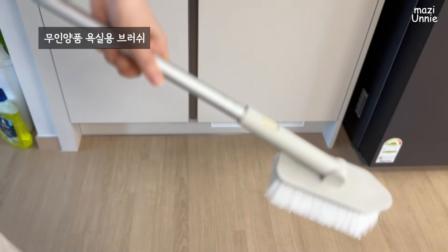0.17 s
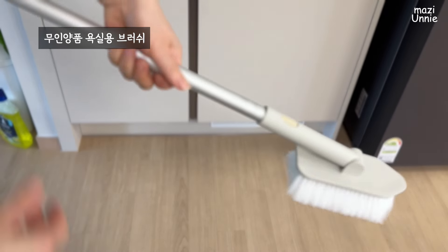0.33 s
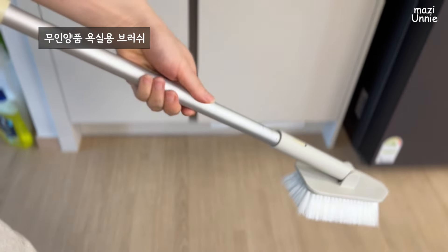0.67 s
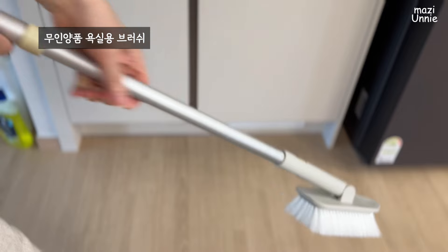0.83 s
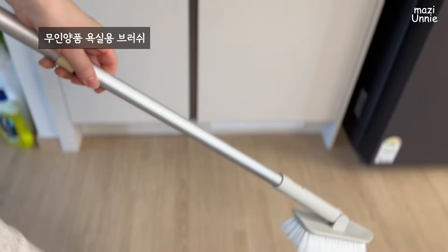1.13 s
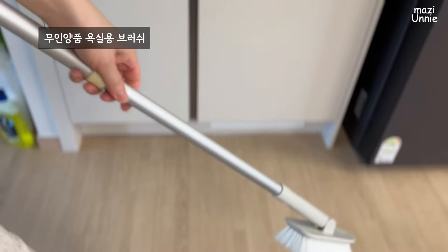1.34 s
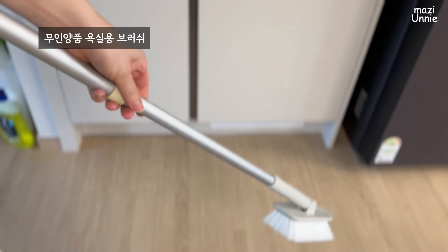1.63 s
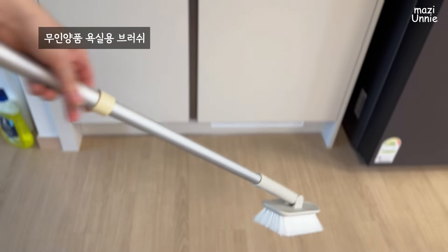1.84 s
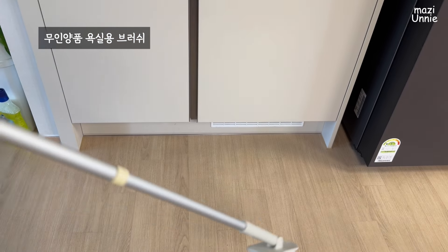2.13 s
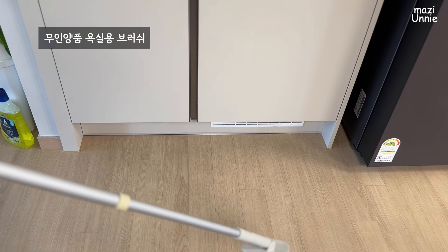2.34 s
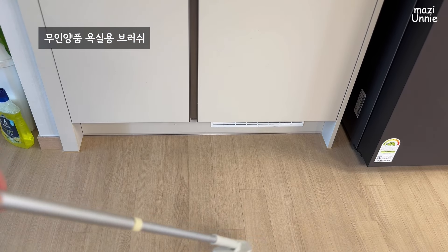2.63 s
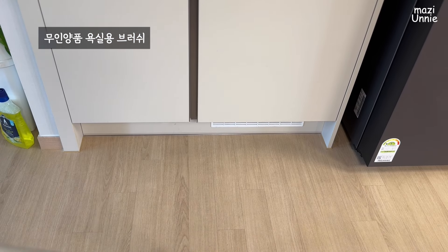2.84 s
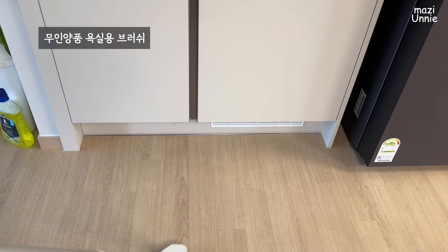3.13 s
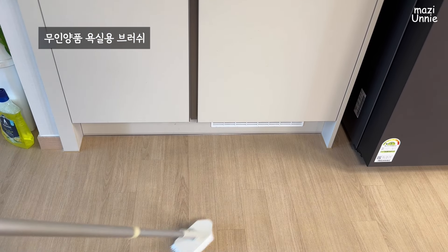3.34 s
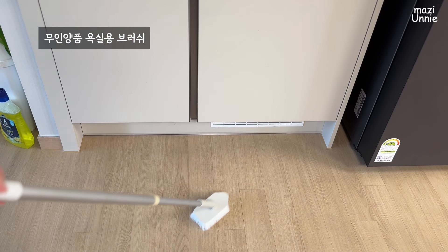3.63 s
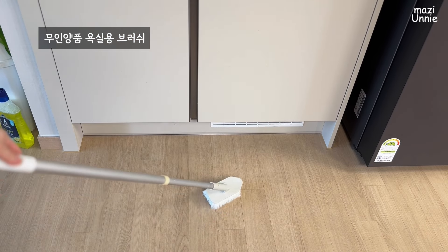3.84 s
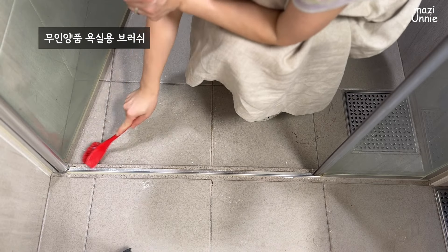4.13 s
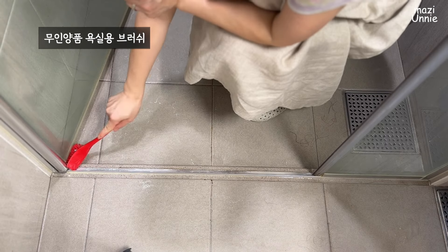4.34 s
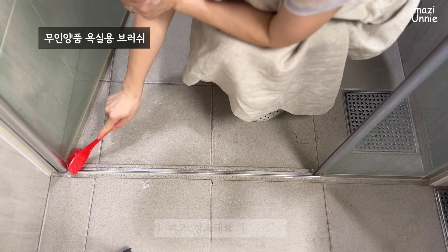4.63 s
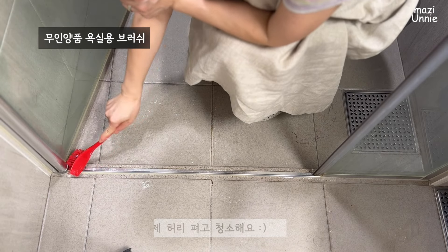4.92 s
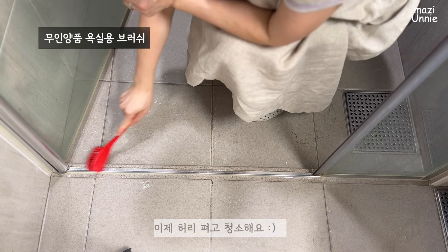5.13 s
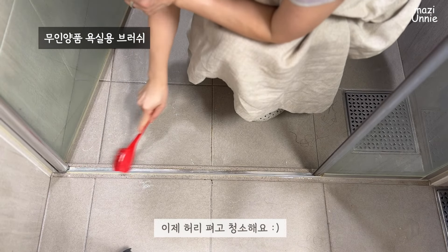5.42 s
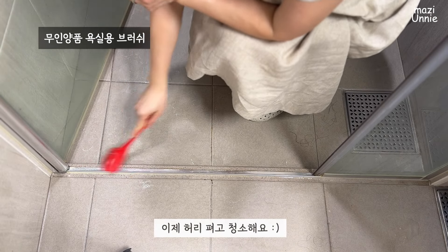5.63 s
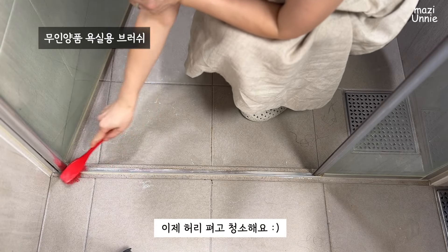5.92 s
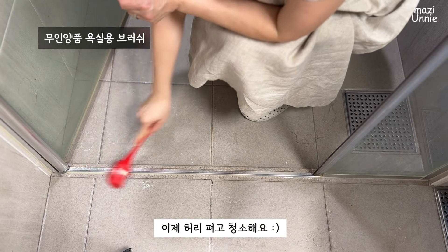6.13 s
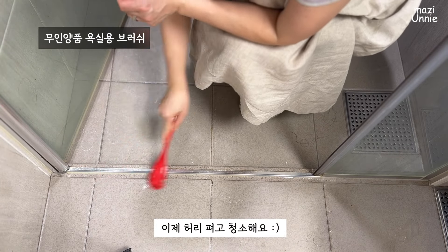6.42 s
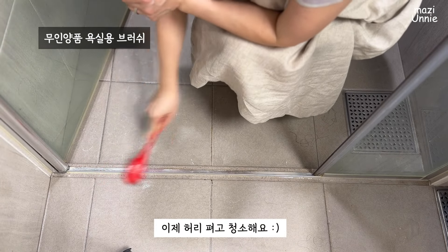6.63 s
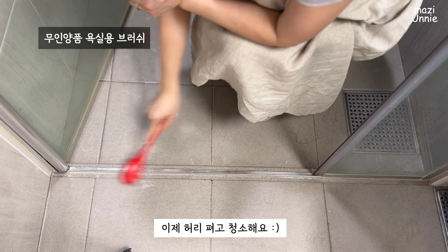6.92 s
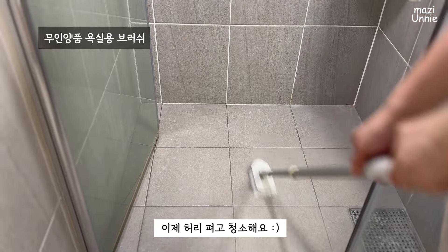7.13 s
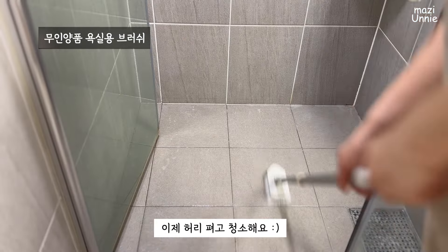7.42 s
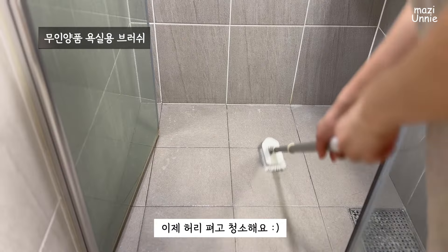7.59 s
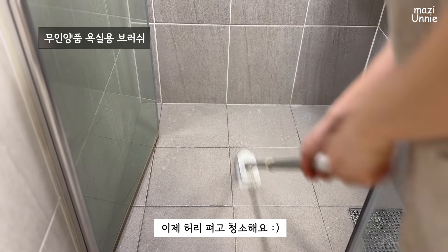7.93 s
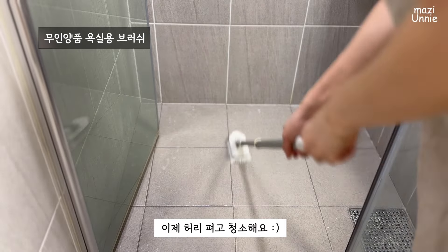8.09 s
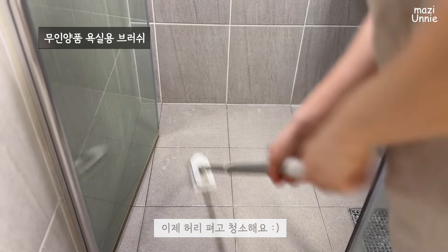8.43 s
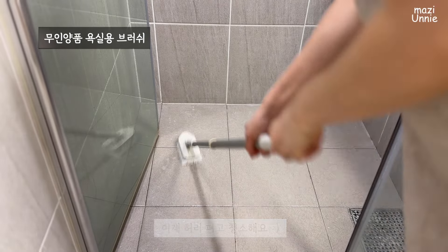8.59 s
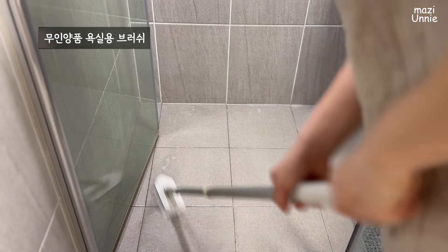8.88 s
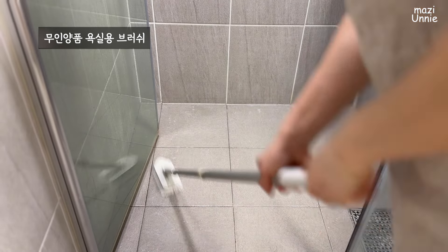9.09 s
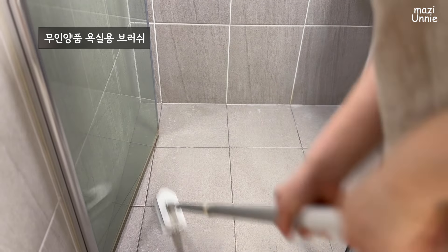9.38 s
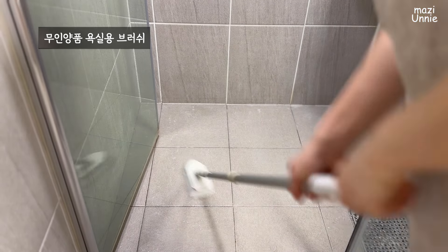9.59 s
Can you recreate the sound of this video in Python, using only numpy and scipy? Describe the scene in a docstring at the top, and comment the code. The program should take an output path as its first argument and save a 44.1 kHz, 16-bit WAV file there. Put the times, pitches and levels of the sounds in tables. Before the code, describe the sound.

A wavering low appliance hum and soft rumble fill a lively kitchen from 0 to 4.2 s. A metal pole slides through a hand with a thin bright hiss, swelling around 0.8 s; a small clack comes at 0.65 s and clicks at 1.4-1.5 s as its lock snaps. Dry bristle sweeps on wood follow from 1.6 s, with light plastic clacks, then a loud, hard clack with rapid rebounds and metallic ring at 2.85 s. Softer clacks come near 3.3 s, and sweeping continues. At 4.2 s the hum cuts to a quiet, small tiled shower. Faint scuffs, scrapes and knocks accompany short hand-brush strokes, about six per second, pausing briefly at 5.75 s and then louder and brighter. From 7.1 s a pole brush makes longer, fuller hissing strokes, about four per second, with soft low floor thuds. At 9.0 s it bumps the glass dully; scrubbing continues until about 9.8 s.

```python
"""In a kitchen, over a low appliance hum, a long-handled brush slides through the hand and sweeps a wooden
floor; its hinged plastic head clacks. Then, in a quiet tiled shower, a hand brush scrubs in quick short
strokes and a pole brush in longer ones, once bumping the glass screen.
Friction is shaped random bristle flicks, raised by stroke speed; impacts are damped modes and noise bursts;
the hum is a wavering sine; decaying noise gives the reflections of each room."""
import sys
import numpy as np
from scipy import signal
from scipy.fft import rfft, irfft, next_fast_len
from scipy.io import wavfile

SR = 44100
rng = np.random.default_rng(int(sys.argv[2]) if len(sys.argv) > 2 else 0)


def inscribe(sig):
    """Save sig as 16-bit PCM at rate SR to the path in sys.argv[1].

    A 1-D sig is mono; a 2-D sig holds one channel per row.
    Samples are clipped to [-1, 1] before scaling.
    """
    pcm = np.round(np.clip(np.atleast_2d(sig).T, -1, 1) * 32767)
    wavfile.write(sys.argv[1], SR, pcm.astype(np.int16))


N = 429975
TIME = np.arange(N) / SR
SHOWER_FROM_S, POLE_BRUSH_FROM_S = 4.163, 7.09
PORT_LAG_S = .000263
CLACK_LAG_S = .00011   # the head clacks more nearly straight ahead


def from_db(db):
    """Logarithmic level: decibels to amplitude gain."""
    return 10 ** (np.asarray(db) / 20)


def rms_one(x):
    """Normalization: scale to unit root-mean-square amplitude."""
    return x / np.sqrt(np.mean(x ** 2) + 1e-20)


def low_passed(x, order, cutoff_hz):
    """Low-pass filtering: keep what lies below the cutoff."""
    return signal.sosfilt(signal.butter(order, cutoff_hz, fs=SR, output="sos"), x)


def coloured(x, spectrum):
    """Spectral shaping: weight a steady signal by a spectrum that falls away beyond its ends; rms 1."""
    hz, db = np.transpose(spectrum)
    size = next_fast_len(N)
    f = np.maximum(np.arange(size // 2 + 1) * SR / size, 1)
    slopes = np.minimum(1, np.minimum(f / hz[0], hz[-1] / f)) ** 2
    gain = from_db(np.interp(np.log(f), np.log(hz), db)) * slopes
    return rms_one(irfft(rfft(x, size) * gain, size)[..., :N])


def drift(rate_hz):
    """Slow random modulation: a smooth wander of rms 1 through random knots."""
    knots = rng.standard_normal(int(N / SR * rate_hz * 2) + 2)
    return rms_one(np.interp(TIME * rate_hz * 2, np.arange(len(knots)), knots))


def near(x, lag_s=PORT_LAG_S):
    """Path difference: direct sound reaches the left microphone port a little before the right."""
    taps = np.arange(24)
    fractional_delay = np.sinc(taps - lag_s * SR) * np.hanning(len(taps))
    return np.array([x, signal.lfilter(fractional_delay, 1, x)])


def room(x, t60, treble_t60, alike_below_hz):
    """Reverberation: a diffuse tail of unit power with separate bass and treble decays, its bass alike at both ports."""
    t = TIME[:SR]
    noise = rng.standard_normal((2, SR))
    bass = signal.sosfiltfilt(signal.butter(2, alike_below_hz, fs=SR, output="sos"), noise)
    noise = noise - bass + bass[0]
    dull = signal.sosfiltfilt(signal.butter(1, 3500, fs=SR, output="sos"), noise)
    tail = dull * from_db(-60 * t / t60) + (noise - dull) * from_db(-60 * t / treble_t60)
    tail *= np.minimum(t / 0.0048, 1)   # reflections build up first
    tail /= np.sqrt(np.sum(tail ** 2, axis=1, keepdims=True))
    return signal.oaconvolve(x[None], tail, axes=1)[:, :N]


def lingering(gain, wet, t60):
    """Energy storage: reflections of a moving source hold its level up for a moment."""
    r = from_db(-120 / (t60 * SR))   # decay of power per sample
    held_power = signal.lfilter([1 - r], [1, -r], gain ** 2 + 1e-18)
    return np.sqrt((1 - wet) * gain ** 2 + wet * held_power)


def bristles(spectrum, flicks_per_s, spread_db, clump_db, channels=1):
    """Stick-slip: single bristles catch and flick free at random; whole tufts letting go bunch the flicks."""
    shape = (channels, N)
    released = rng.random(shape) < flicks_per_s / SR
    flicks = released * rng.standard_normal(shape) * from_db(spread_db * rng.standard_normal(N))
    bunching_db = clump_db * drift(220) + 2.0 * clump_db * drift(35)
    return coloured(flicks * from_db(bunching_db), spectrum)


def stroke_levels(starts, levels_db, end_s, tops, overlap_s):
    """Kinematics: the brush speeds up and slows to the turn; each noise (a row of levels) follows the speed.

    tops: place of top speed within a stroke, 0-1; overlap_s: bristles still flexing at the turn."""
    power, speed = np.zeros((len(levels_db), N)), np.zeros(N)
    ends = np.append(starts[1:], end_s)
    for k, (start, end) in enumerate(zip(starts - overlap_s, ends + overlap_s)):
        span = slice(int(start * SR), int(end * SR))
        fastest = start + tops[k % len(tops)] * (end - start)
        swing = np.sin(np.pi * np.interp(TIME[span], [start, fastest, end], [0, .5, 1]))
        speed[span] += swing
        power[:, span] += (from_db(levels_db)[:, k, None] * swing) ** 2
    return speed, np.sqrt(power)


def strike(times, levels_db, modes, vary_db):
    """Modal superposition: each contact rings every damped mode with a strength of its own."""
    at, out = np.round(np.asarray(times) * SR).astype(int), np.zeros(N)
    chance = rng.standard_normal((len(at), len(modes)))
    for k, (hz, db, t60) in enumerate(modes):
        blows = np.full(N, 1e-18)
        blows[at] = from_db(levels_db + db + vary_db * chance[:, k]) * (-1) ** k
        r, w = from_db(-60 / (t60 * SR)), 2 * np.pi * hz / SR
        out += signal.lfilter([0, np.sin(w)], [1, -2 * r * np.cos(w), r * r], blows)
    return out


def rattle(times, levels_db, pitches_hz, t60, width):
    """High modal density: crowded, quickly damped modes as a noise burst around each contact's pitch."""
    out, t = np.zeros((2, N + SR)), TIME[:SR // 4]
    for s, db, hz in zip(times, levels_db, pitches_hz):
        edges = np.clip([hz / (1 + width), hz * (1 + width)], 20, .45 * SR)
        band = signal.butter(2, edges, "band", fs=SR, output="sos")
        alike = 1 / (1 + (hz / 600) ** 2)   # long waves reach both ports alike
        shared = np.sqrt(alike) * rng.standard_normal(len(t))
        separate = np.sqrt(1 - alike) * rng.standard_normal((2, len(t)))
        burst = rms_one(signal.sosfilt(band, shared + separate))
        out[:, round(s * SR):][:, :len(t)] += burst * from_db(db - 60 * t / t60)
    return out[:, :N]


# resonances of the plastic head: (frequency [Hz], relative level [dB], t60 [s])
HEAD_MODES = [(172.7, -12.5, 0.19), (484, -7, 0.023), (984, -6, 0.027), (1727, -3.5, 0.029),
              (2130, -3.5, 0.03), (4260, -10.5, 0.03)]


def plastic(contacts, ring_db, rattle_db, rattle_t60, tick_t60):
    """Impact excitation: the hard head rings and rattles, and a brief bright tick comes with each contact."""
    times, levels_db, pitches_hz, tick_db = np.transpose(contacts)
    ring = near(strike(times, levels_db + ring_db, HEAD_MODES, vary_db=3.5), CLACK_LAG_S)
    body = ring + rattle(times, levels_db + rattle_db, pitches_hz, rattle_t60, width=0.36)
    tick = rattle(times, tick_db - 12.0, np.full(len(times), 11000), tick_t60, width=0.9)[0]
    return body, tick


# spectra of the kitchen's rumble and air noise: (frequency [Hz], relative density [dB per Hz])
RUMBLE_SPECTRUM = [(35, -15.5), (55, 3.5), (90, -8.5), (170, -5.5), (300, -12), (500, -19.5), (900, -50)]
KITCHEN_AIR_SPECTRUM = [(60, -1.5), (200, 4), (650, 4), (1500, -5.5), (3000, -16), (4400, -11), (5900, -4),
                        (7700, -17), (11000, -36.5)]
HUM_HZ, HUM_DB = 59.5, -53.5


def kitchen_background():
    """Tonal and broadband radiation: a wavering hum over low rumble and air noise."""
    waver = from_db(1.4 * drift(5))
    hum = from_db(HUM_DB) * waver * np.sqrt(2) * np.sin(2 * np.pi * HUM_HZ * TIME + .15 * drift(6.7))
    rumble = from_db(-56.5) * coloured(rng.standard_normal(N), RUMBLE_SPECTRUM)
    air = from_db(-59.5) * coloured(rng.standard_normal((2, N)), KITCHEN_AIR_SPECTRUM)
    return (hum + rumble) * from_db([[-.4], [.4]]) + air


# spectrum of the bathroom's air noise: (frequency [Hz], relative density [dB per Hz])
BATHROOM_AIR_SPECTRUM = [(25, 5), (45, 7), (66, 17), (95, 6), (200, -14), (1500, -5)]


def bathroom_air():
    """Broadband background: faint noise dominated by the bass."""
    return from_db(-81.5) * coloured(rng.standard_normal(N), BATHROOM_AIR_SPECTRUM)


# weight shifting on the floor: (time [s], relative level [dB])
THUDS = [(4.908, -63.5), (5.2, -70), (7.17, -63), (7.218, -57.5), (7.71, -56), (8.179, -62), (9.66, -60),
         (9.711, -62)]
# resonances of the floor: (frequency [Hz], relative level [dB], t60 [s])
FLOOR_MODES = [(66.5, -7, 0.14), (128, -4, 0.072), (175, -9, 0.097), (243, -10, 0.078)]


def floor_thuds():
    """Structural resonance: shifting weight sets the floor's low modes ringing softly."""
    return from_db(2.5) * strike(*np.transpose(THUDS), FLOOR_MODES, vary_db=1.0)


# brush on the sill and tile joints:
# (time [s], relative body level [dB], pitch [Hz], relative tick level [dB])
KNOCKS = [(4.595, -63, 2700, -58), (4.964, -63.5, 1400, -85), (5.036, -61, 1260, -72),
          (6.742, -65, 1900, -56), (7.035, -64.5, 1250, -74), (8.345, -63.5, 740, -62)]


def tile_knocks():
    """Impact excitation: the brush knocks on the shower's sill and tile joints."""
    return plastic(KNOCKS, ring_db=-30, rattle_db=2.5, rattle_t60=0.11, tick_t60=0.023)


# bristles along the sill: (start [s], end [s], relative level [dB])
SILL_SCRAPES = [(4.365, 4.4, -70), (4.405, 4.46, -62.5), (4.96, 5.25, -73), (5.025, 5.075, -66)]
# resonances of the sill: (frequency [Hz], relative level [dB], t60 [s])
SILL_MODES = [(1040, 3, 0.04), (1285, 3.5, 0.12), (1460, -3, 0.061)]
SILL_SLIPS_PER_S, SILL_SPREAD_DB, SILL_GRIT_HZ = 600, 2.5, 1530


def sill_scrapes():
    """Stick-slip: bristles slip in quick uneven jerks along the sill, gritty and a little hollow."""
    times, levels_db = [], []
    for start, end, db in SILL_SCRAPES:
        slips = int(SILL_SLIPS_PER_S * (end - start))
        places = rng.random(slips)
        swell_db = 10 * np.log10(np.sin(np.pi * places))
        times.extend(start + places * (end - start))
        levels_db.extend(db + swell_db + SILL_SPREAD_DB * rng.standard_normal(slips))
    levels_db = np.array(levels_db)
    pitches_hz = SILL_GRIT_HZ * 2 ** (0.48 * rng.standard_normal(len(times)))
    hollow = near(strike(times, levels_db - 14.5, SILL_MODES, vary_db=3.0))
    return hollow + rattle(times, levels_db - 4, pitches_hz, t60=0.033, width=0.61)


# contacts of brush and glass screen: (time [s], relative level [dB], pitch [Hz])
BUMPS = [(8.9982, -35.5, 900), (9.005, -34.5, 310), (9.009, -35.5, 480), (9.023, -38, 704),
         (9.047, -40, 400)]
# resonances of the screen: (frequency [Hz], relative level [dB], t60 [s])
SCREEN_MODES = [(270, -7, 0.03), (370, -3, 0.03), (490, -7, 0.073), (795, -14, 0.03), (1170, -17, 0.027)]
BUMP_SOFT_HZ = 1160   # the cushioned contact excites little above this
BEND_DB, BEND_FROM_HZ, BEND_TO_HZ = -36, 1644, 320
BEND_DROP_S, BEND_SWELL_S = 0.0018, 0.0054   # time constant of the pitch drop; time to the peak


def glass_bump():
    """Dispersion: treble runs ahead in the glass, so the first wave falls in pitch; modes and chatter follow."""
    times, levels_db, pitches_hz = np.transpose(BUMPS)
    t = np.maximum(TIME - times[0], 0)
    hz = BEND_TO_HZ + (BEND_FROM_HZ - BEND_TO_HZ) * np.exp(-t / BEND_DROP_S)
    fade = np.exp(np.maximum(.5 - .5 * (t / BEND_SWELL_S) ** 2 / 2, -60))
    swell = np.sqrt(t / BEND_SWELL_S) * fade
    bend = from_db(BEND_DB) * swell * np.sin(2 * np.pi * np.cumsum(hz * (t > 0)) / SR)
    pane = strike(times, levels_db - 5, SCREEN_MODES, vary_db=0.5)
    chatter = rattle(times, levels_db - 6, pitches_hz, t60=0.1, width=1.0)
    return bend + low_passed(pane + chatter, 2, BUMP_SOFT_HZ)


# onset of the pane's sway just after the bump: (time [s], relative level [dB])
SWAY = [(9.036, -54)]
# slow modes of the whole pane: (frequency [Hz], relative level [dB], t60 [s])
SWAY_MODES = [(64.6, 2.2, 0.56)]


def glass_sway():
    """Fundamental resonance: just after the bump the whole pane sways."""
    return strike(*np.transpose(SWAY), SWAY_MODES, vary_db=0)


# the telescopic pole's lock snapping home: (time [s], relative level [dB])
LOCK = [(1.5052, -45)]
# modes of the lock: (frequency [Hz], relative level [dB], t60 [s])
LOCK_MODES = [(1870, -17, 0.17), (5770, -0.5, 0.063), (6900, -1, 0.044)]


def pole_lock():
    """Modal ringing: the lock snaps home and rings briefly."""
    return strike(*np.transpose(LOCK), LOCK_MODES, vary_db=0)


# resonances of the metal pole: (frequency [Hz], relative level [dB], t60 [s])
POLE_MODES = [(781, -5.5, 0.44), (1010, -7.5, 0.15), (1490, -14.5, .3), (1720, -15.5, .3),
              (1937, -5.5, .36), (2280, -8, 0.29), (4915, -13, 0.31), (5620, -15.5, .25)]
POLE_RING_DB = -18.5
POLE_SPLIT = 0.032   # the pole bends in two planes: each mode has a twin lower by this share


def pole_ring(clacks):
    """Mode splitting: each clack or click sets the metal pole ringing in close, beating pairs of modes."""
    times, *_, passed_db = np.transpose(clacks)
    twins = [(hz * (1 - POLE_SPLIT), db, t60) for hz, db, t60 in POLE_MODES]
    return strike(times, passed_db + POLE_RING_DB, POLE_MODES + twins, vary_db=4.0)


REBOUND_S, REBOUND_FOLLOWS = 0.0042, .28   # mean gap after the hardest clack; share of the level's swing
REBOUND_LOSS_DB, REBOUND_PITCH_RATIO, REBOUND_TICK_GAIN_DB = 2.5, 0.798, 0.5


def rebounding(clacks, count):
    """Rebound: each clack repeats with a softer, lower body and a slightly stronger tick, sooner if weaker."""
    uneven = rng.uniform(.85, 1.15, (len(clacks), count))
    levels_db = np.array(clacks)[:, 1]
    gaps_s = REBOUND_S * from_db(REBOUND_FOLLOWS * (levels_db - levels_db.max()))
    contacts = []
    for i, (s, db, hz, tick_db, _) in enumerate(clacks):
        for k in range(count):
            contacts.append((s + gaps_s[i] * k * uneven[i, k],
                             db - REBOUND_LOSS_DB * k,
                             hz * REBOUND_PITCH_RATIO ** k,
                             tick_db + REBOUND_TICK_GAIN_DB * k))
    return contacts


# clacks of the hinged head, and at 1.505 s the click of the pole's lock:
# (time [s], relative body level [dB], pitch [Hz],
#  relative tick level [dB], relative level passed on to the pole [dB])
CLACKS = [(.649, -38.5, 2680, -39.5, -43), (1.437, -37, 450, -52, -59), (1.446, -41.5, 2300, -44, -66),
          (1.505, -41.5, 5530, -57, -70), (2.115, -45, 2100, -49, -52), (2.331, -40, 2500, -54, -62),
          (2.709, -38, 1200, -52, -52.5), (2.795, -42, 2980, -29, -32), (2.8502, -20.5, 1450, -59.5, -38.5),
          (2.8567, -16, 1800, -18.5, -22.5), (2.8565, -21, 4100, -45.5, -45),
          (2.8597, -20, 850, -30, -27.5), (2.866, -22, 325, -30.5, -37), (2.8725, -22.5, 1500, -40.5, -34),
          (2.916, -33.5, 2400, -50, -39), (3.11, -37.5, 1280, -69, -50), (3.305, -32, 1750, -60, -37),
          (3.31, -29.5, 2200, -58, -39)]


def clacks_and_lock():
    """Coupled vibration: the head's clacks and the lock's click also ring the pole, within a lively room."""
    contacts = rebounding(CLACKS, count=4)
    body, tick = plastic(contacts, ring_db=-14.0, rattle_db=-10.0, rattle_t60=0.057, tick_t60=.022)
    metal, lock = pole_ring(CLACKS), pole_lock()
    direct = body + near(tick) + near(metal, CLACK_LAG_S) + lock
    reflected = from_db(-5.0) * room(body[0] + metal + lock + tick, 0.45, 0.37, 310)
    return (direct + reflected) * from_db([[.8], [-.8]])


# rubs that catch a high resonance of the metal pole:
# (start [s], end [s], frequency [Hz], relative bandwidth [ratio], relative level [dB])
SINGING_RUBS = [(0.739, 0.943, 8140, 0.017, -50.5), (0.91, 1.015, 6000, .03, -62),
                (1.85, 2.092, 6540, 0.2, -54.5)]


def singing_rubs():
    """Resonant filtering: friction noise through one narrow resonance swells and fades, catching unevenly."""
    out = np.zeros((2, N))
    for start, end, hz, width, db in SINGING_RUBS:
        at, size = round(start * SR), round((end - start) * SR)
        edges = [hz / (1 + width / 2), hz * (1 + width / 2)]
        band = signal.butter(1, edges, "band", fs=SR, output="sos")
        tone = rms_one(signal.sosfilt(band, rng.standard_normal((2, size))))
        out[:, at:at + size] += from_db(db) * np.sqrt(np.hanning(size)) * tone
    return out * from_db(2.0 * drift(25.17) + 1.2 * drift(110) - 1.0)


# hiss of the pole sliding through the hand: (time [s], relative level [dB])
SLIDE = [(0.0, -72), (0.106, -65.5), (0.22, -75), (0.544, -74), (0.558, -61), (0.818, -46), (0.938, -54),
         (1.092, -78), (1.318, -75.5), (1.456, -63), (1.526, -61), (1.59, -77)]
SLIDE_RASP_DB, SLIDE_RASP_FOLLOWS = -76, 0.27   # rasp at the mean level and its share of the swing
# sweeps on the wood, with a near halt after the head has flipped:
# (start [s], relative hiss level [dB], relative rasp level [dB])
SWEEPS = [(1.615, -54.5, -72), (1.775, -48.5, -61.5), (1.965, -50.5, -75), (2.075, -50, -61),
          (2.215, -59, -65), (2.47, -47.5, -68), (2.775, -54.5, -56.5), (3.11, -67.5, -69),
          (3.235, -48, -58), (3.51, -52, -61), (3.85, -56, -66), (4.076, -54.5, -59.5)]


def dry_friction():
    """Speed-dependent friction: gains of hiss and rasp for the sliding pole, then for the sweeps."""
    times, levels_db = np.transpose(SLIDE)
    hiss_db = np.interp(TIME, times, levels_db)
    rasp_db = SLIDE_RASP_DB + SLIDE_RASP_FOLLOWS * (hiss_db - levels_db.mean())
    slide = from_db([hiss_db, rasp_db]) * (TIME < times[-1])
    starts, *sweep_db = np.transpose(SWEEPS)
    _, sweep = stroke_levels(starts, sweep_db, end_s=4.22, tops=[0.49], overlap_s=0.026)
    return np.hypot(slide, sweep)


# spectra of dry hiss and dry rasp: (frequency [Hz], relative density [dB per Hz])
DRY_HISS_SPECTRUM = [(4000, -14), (6000, -1), (7400, -4.5), (9200, -3), (10800, 5), (12500, 1.5),
                     (15500, 1)]
DRY_RASP_SPECTRUM = [(500, -4.5), (1000, -1), (1900, 6.5), (3000, 3), (4500, -2), (7000, -0.5), (9000, -27)]


def dry_brush():
    """Dry friction noise: a bright hiss with a lower, wider rasp under it."""
    hiss_gain, rasp_gain = dry_friction()
    hiss_grain = bristles(DRY_HISS_SPECTRUM, 15000, 0.89, 0.83)[0]
    hiss = from_db(-0.5) * lingering(hiss_gain, wet=0.083, t60=0.32) * hiss_grain
    rasp = from_db(2.5) * rasp_gain * bristles(DRY_RASP_SPECTRUM, 9000, 1.2, 0.4, channels=2)
    return near(hiss) + rasp


# hand brush pressed flat: (start [s], end [s], relative level [dB])
SCUFFS = [(4.14, 4.272, -64.5), (4.59, 4.716, -72), (4.91, 5.316, -71.5), (5.826, 6.033, -70)]
# spectrum of the scuffs: (frequency [Hz], relative density [dB per Hz])
SCUFF_SPECTRUM = [(350, -7.5), (600, -2.5), (1300, 2.5)]
SCUFF_ATTACK_S = 0.016


def scuffs():
    """Sliding friction: bristles pressed flat drag with a dull grain that starts quickly and fades."""
    gain = np.zeros(N)
    for start, end, db in SCUFFS:
        gain += from_db(db) * np.interp(TIME, [start, start + SCUFF_ATTACK_S, end], [0, 1, 0])
    return gain * near(bristles(SCUFF_SPECTRUM, 2000, 2, 1)[0])


# strokes of the hand brush on the tiles: (start [s], relative tip hiss level [dB], relative rasp level [dB])
HAND_STROKES = [(4.07, -70, -71.5), (4.315, -75, -72), (4.385, -65.5, -68), (4.545, -67, -67.5),
                (4.67, -65.5, -69), (4.812, -64.5, -67.5), (4.94, -65, -65), (5.097, -61, -61.5),
                (5.245, -61.5, -61.5), (5.416, -61, -63), (5.563, -62, -63), (5.778, -55.5, -59.5),
                (5.938, -55.5, -58.5), (6.09, -55, -58), (6.25, -51, -54), (6.413, -51, -55.5),
                (6.572, -52, -57), (6.716, -51, -54.5), (6.874, -52, -56), (7.012, -52.5, -55)]
HAND_RUB_DB = -79.5
HAND_PAUSE_FROM_S, HAND_PAUSE_TO_S = 5.745, 5.831


def hand_brush():
    """Speed-dependent friction: hiss, rasp and a faint even rub, which stop briefly and resume mid-stroke."""
    starts, hiss_db, rasp_db = np.transpose(HAND_STROKES)
    levels_db = [hiss_db, rasp_db, np.full(len(starts), HAND_RUB_DB)]
    speed, gains = stroke_levels(starts, levels_db, end_s=7.13, tops=[0.45], overlap_s=0.014)
    sounding = (TIME < HAND_PAUSE_FROM_S) | (TIME > HAND_PAUSE_TO_S)
    return speed, gains * sounding


# strokes of the pole brush, pull and push in turn: (start [s], relative tip hiss level [dB])
POLE_STROKES = [(7.07, -57), (7.318, -51.5), (7.587, -53), (7.813, -49), (8.068, -51.5), (8.316, -49.5),
                (8.578, -51.5), (8.817, -50.5), (9.062, -52.5), (9.299, -50.5), (9.553, -54)]
POLE_END_S, PULL_TOP, PUSH_TOP = 9.8, 0.59, 0.37
POLE_OVERLAP_S, POLE_DRAG_S = 0.019, 0.062   # the wide head keeps rubbing through the turn
# level at mean effort [dB], and the gain for each dB of tip hiss [dB]
POLE_RASP_DB, POLE_RASP_FOLLOWS = -53, 0.88
POLE_RUB_DB, POLE_RUB_FOLLOWS = -66.5, 0.59


def pole_brush():
    """Force-dependent friction: more effort raises the hiss most and the rub least."""
    starts, hiss_db = np.transpose(POLE_STROKES)
    effort_db = hiss_db - hiss_db.mean()
    rasp_db = POLE_RASP_DB + POLE_RASP_FOLLOWS * effort_db
    rub_db = POLE_RUB_DB + POLE_RUB_FOLLOWS * effort_db
    tops = [PULL_TOP, PUSH_TOP]
    speed, gains = stroke_levels(starts, [hiss_db, rasp_db], POLE_END_S, tops, POLE_OVERLAP_S)
    _, rub = stroke_levels(starts, [rub_db], POLE_END_S, tops, POLE_DRAG_S)
    return speed, np.vstack([gains, rub])


def both_brushes():
    """Succession of sources: speed and gains of first the hand brush, then the pole brush."""
    return [np.where(TIME < POLE_BRUSH_FROM_S, hand, pole) for hand, pole in zip(hand_brush(), pole_brush())]


TUFTS_PER_S, TUFT_RING_CYCLES, TUFT_PATCHY_DB = 45, 55, 4   # rate per pitch at unit speed; cycles to -60 dB
TUFT_LOW_HZ, TUFT_HIGH_HZ = 2064, 7980


def tufts(speed, count):
    """Elastic release: tufts snap and ring, more often at speed, with ever-changing weight by pitch; rms 1."""
    out = np.zeros((2, N))
    for hz in np.geomspace(TUFT_LOW_HZ, TUFT_HIGH_HZ, count):
        times = np.sort(rng.uniform(SHOWER_FROM_S, TIME[-1], 4000))
        chance = TUFTS_PER_S * speed[(times * SR).astype(int)] * np.ptp(times) / len(times)
        kept = rng.random(len(times)) < chance
        mode = (hz, 0, TUFT_RING_CYCLES / hz)
        snaps = strike(times, np.where(kept, 0, -200), [mode], vary_db=3)
        angle = rng.uniform(0, 2 * np.pi)   # each pitch reaches the two ports in its own way
        patchy = rms_one(snaps) * from_db(TUFT_PATCHY_DB * drift(5))
        out += np.outer([np.cos(angle), np.sin(angle)], patchy)
    return rms_one(out)


# spectra of tip hiss, rasp and rub on the tiles: (frequency [Hz], relative density [dB per Hz])
TIP_HISS_SPECTRUM = [(6500, -91), (7600, -12.5), (8300, -17), (9300, -6), (10500, 1.5), (13000, -2),
                     (15000, -0.5), (16000, -5.5)]
RASP_SPECTRUM = [(1200, -7.5), (2000, -10), (3200, 1.5), (4400, 2.5), (6000, 4.5), (7800, 5.5), (9000, -15)]
RUB_SPECTRUM = [(150, -5.5), (350, -8.5), (500, -4.5), (800, -4.5), (1050, -9), (1700, 0.5), (2600, 2.5)]
TUFT_DB = -14


def scrubbing():
    """Direct and structure-borne sound: tips hiss straight across; rasp and rub come mostly by the tiles."""
    speed, (hiss_gain, rasp_gain, rub_gain) = both_brushes()
    flicks_per_s = 16000 * (.4 + speed * .6)
    hiss_grain = bristles(TIP_HISS_SPECTRUM, flicks_per_s, 1.0, 0.21)[0]
    hiss = lingering(hiss_gain, wet=0.37, t60=0.18) * hiss_grain
    fine_grain = from_db(0.5) * bristles(RASP_SPECTRUM, flicks_per_s * .6, 0.35, 0.23, channels=2)
    rasp_grain = fine_grain + from_db(TUFT_DB) * tufts(speed, count=24)
    rasp = lingering(rasp_gain, wet=0.43, t60=0.33) * rasp_grain
    rub_grain = bristles(RUB_SPECTRUM, flicks_per_s * .3, 2.9, 0.57, channels=2)
    rub = lingering(rub_gain, wet=0.28, t60=0.35) * rub_grain
    # the changing angle of the bristles tips the rasp between dull and bright
    dull = low_passed(rasp, 1, 3500)
    lean_db = 2.0 * drift(9.4) + np.where(TIME < POLE_BRUSH_FROM_S, -1.2, .5)   # the hand brush is brighter
    tilted_rasp = dull * from_db(lean_db) + (rasp - dull) * from_db(-lean_db)
    scattered = from_db(-2.5) * tilted_rasp + from_db(4.5) * rub
    # close walls stamp their own fixed resonances on its lower part
    walls = from_db(-4.0) * room(low_passed(scattered[0], 2, 2400), 0.18, 0.098, 540)
    crossed = scattered + 0.049 * scattered[::-1]   # a little of each side reaches the other
    return near(from_db(2.0) * hiss) + (from_db(-2.28) * crossed + walls) * from_db([[-.9], [.9]])


def kitchen():
    """Superposition: background noise, dry sliding and sweeping, the clacking head and the lock."""
    return kitchen_background() + dry_brush() + clacks_and_lock()


def shower():
    """Superposition with reverberation: scrubbing, scuffs, knocks, scrapes, bump and thuds in a small hard room."""
    body, tick = tile_knocks()
    blows = body + glass_bump() + floor_thuds() + sill_scrapes() + scuffs()
    reflected = from_db(1.5) * room(blows[0] + tick, 0.32, 0.4, 260)
    return bathroom_air() + scrubbing() + from_db(-1.0) * blows + near(tick) + glass_sway() + reflected


def scene():
    """Crossfading: the kitchen gives way abruptly to the shower."""
    in_shower = np.clip((TIME - SHOWER_FROM_S) / .006, 0, 1)
    return (1 - in_shower) * kitchen() + in_shower * shower() + singing_rubs()


def record(dry):
    """Band limitation: a steep low-pass filter cuts the top at 15850 Hz."""
    return signal.sosfilt(signal.ellip(12, .1, 80, 15850, fs=SR, output="sos"), dry)


dry = scene()
out = record(dry)
inscribe(out)
```